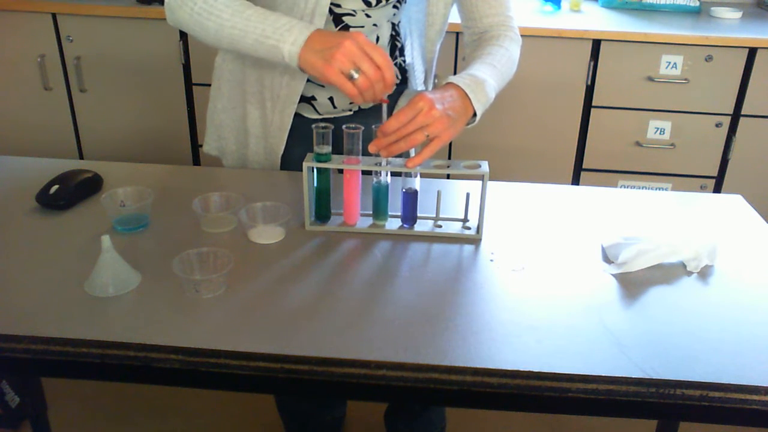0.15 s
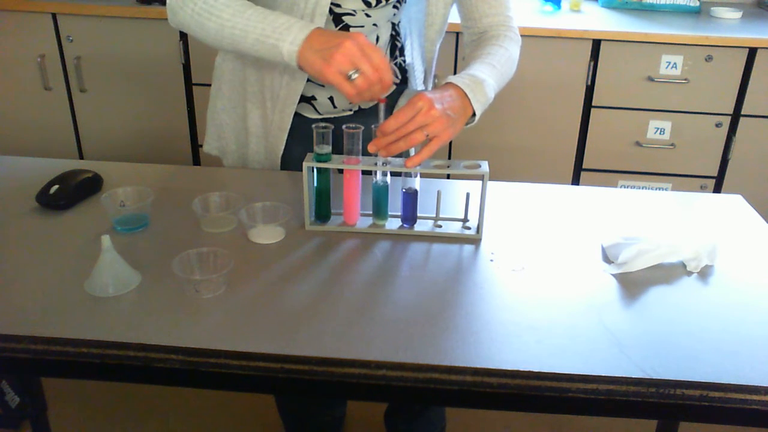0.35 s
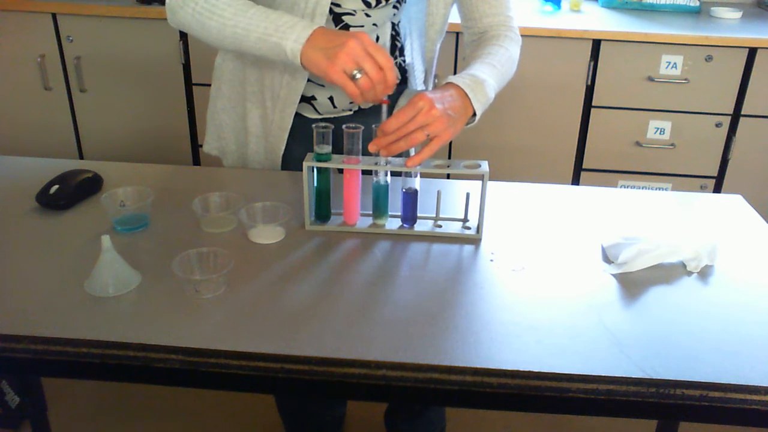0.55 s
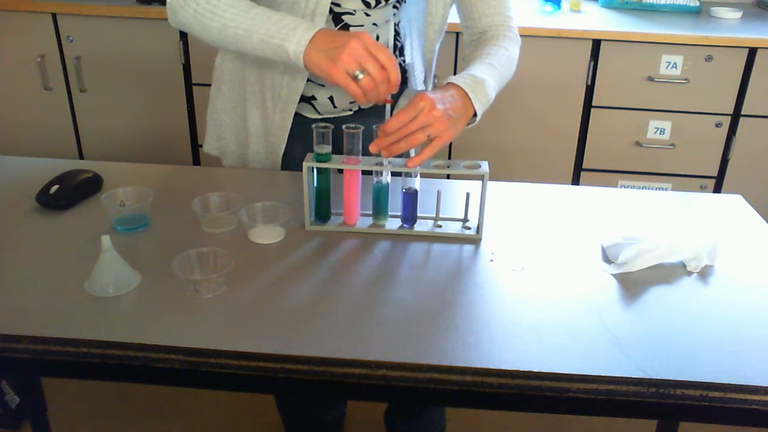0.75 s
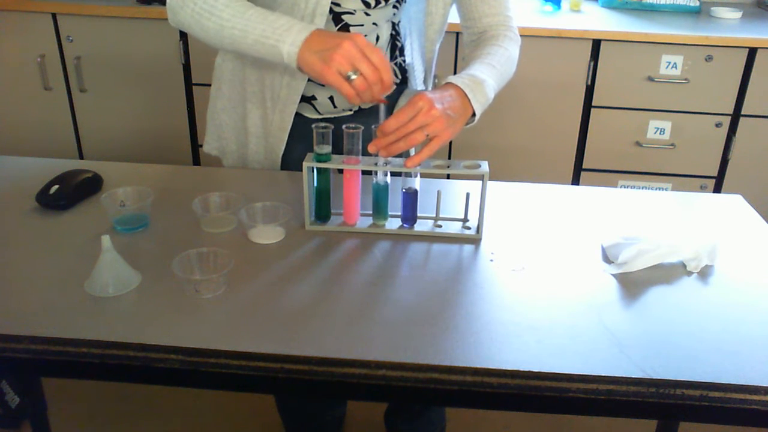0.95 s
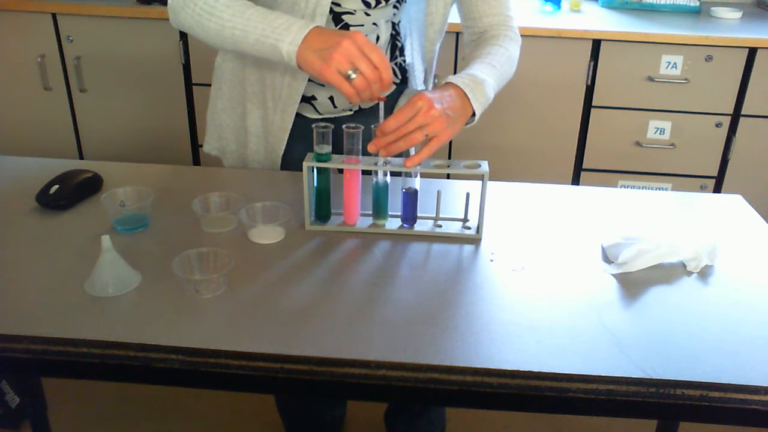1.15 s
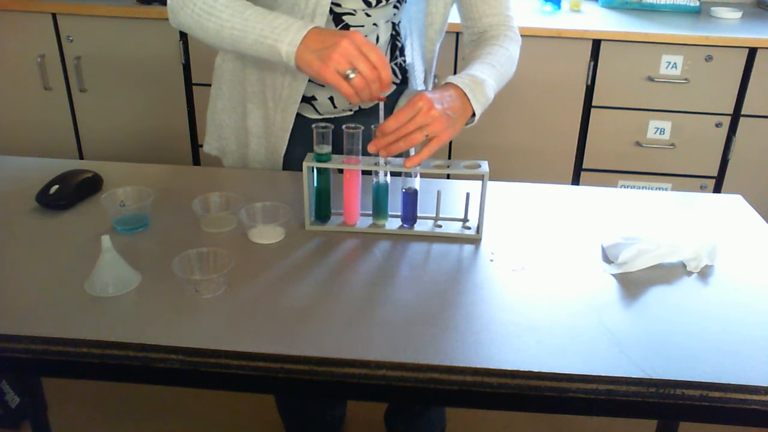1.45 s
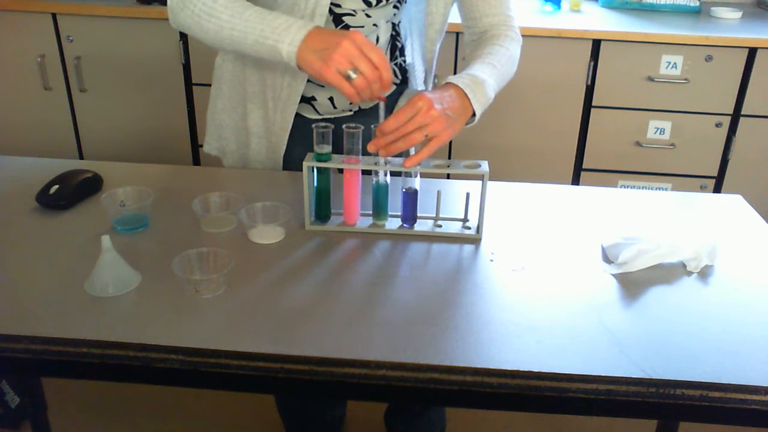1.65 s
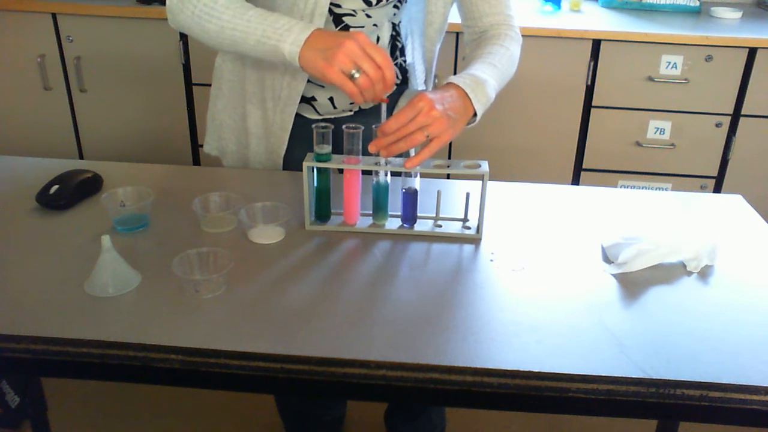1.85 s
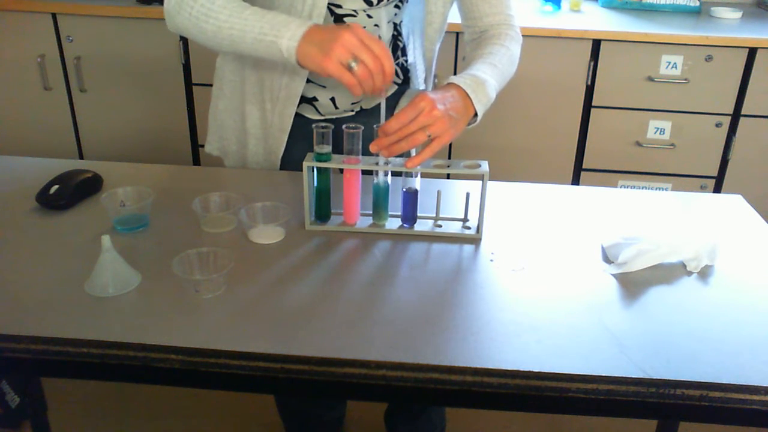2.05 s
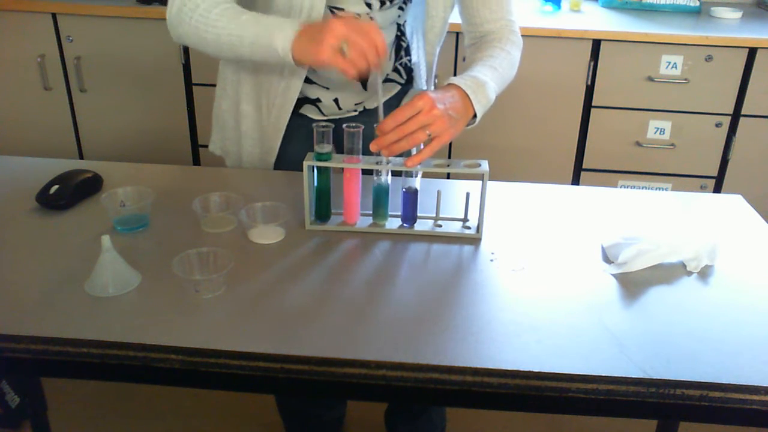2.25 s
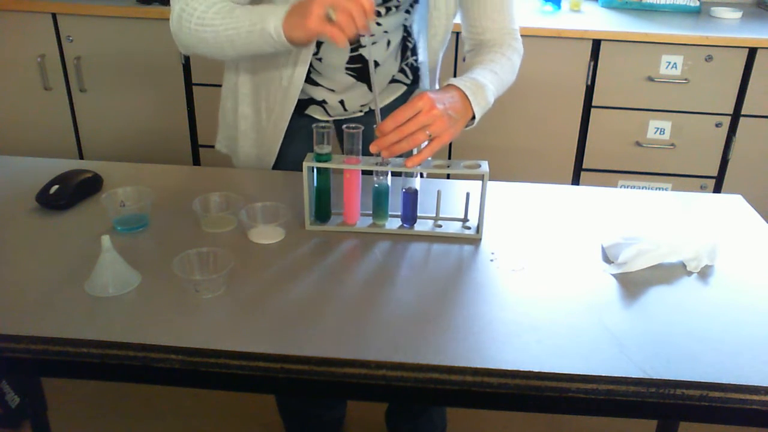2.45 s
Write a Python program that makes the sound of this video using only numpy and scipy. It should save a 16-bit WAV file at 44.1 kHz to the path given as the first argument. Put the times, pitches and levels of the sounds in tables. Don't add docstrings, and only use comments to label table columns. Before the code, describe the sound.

Sharp glassy knocks come singly and in quick pairs as a stem is stirred in a liquid-filled tube, then grow denser and louder after two seconds, over soft room hum, with short indoor reverberation.

```python
import sys
import numpy as np
from scipy import signal
from scipy.fft import rfft, irfft, next_fast_len
from scipy.io import wavfile
from scipy.ndimage import uniform_filter1d, map_coordinates

SR = 44100
rng = np.random.default_rng(int(sys.argv[2]) if len(sys.argv) > 2 else 0)


def magnitude_from_level(level_db):
    exponent = np.asarray(level_db, float) / 20
    return 10 ** exponent


def waveform_to_disk(signal):
    frames = np.transpose(np.atleast_2d(signal))
    scaled = np.clip(frames, -1, 1) * 32767
    samples = np.round(scaled).astype(np.int16)
    wavfile.write(sys.argv[1], SR, samples)


N = 114660
T = np.arange(SR // 5) / SR
LIFT_S = 2.0

# (frequency [Hz], density [dB per Hz])
AIR_SPECTRUM = [(20, -5.5), (45, 2.5), (700, -3), (1100, -16), (1900, -24), (4600, -24), (12000, -21.5),
                (15700, -20.5)]
# (frequency [Hz], level [dB])
MAINS_LINES = [(59, -75), (120, -78.5), (177, -77.5)]
# (time [s], peak level [dB], strongest pitch [Hz], contact [s])
SLIDING_TOUCHES = [(0.009, -40.5, 8340, 0.02), (0.031, -32, 6200, 0.078), (0.313, -32.5, 5700, 0.064),
                   (0.397, -39, 2600, 0.063), (0.422, -31, 4930, 0.011), (0.481, -53, 7800, 0.0048),
                   (0.497, -34.5, 4480, 0.024), (0.62, -43, 2910, 0.048), (0.664, -31, 5350, 0.044),
                   (0.811, -32.5, 5200, 0.025), (0.827, -36, 4700, 0.028), (0.875, -33.5, 5600, 0.027),
                   (0.899, -33.5, 4700, 0.052), (.936, -25.5, 7780, 0.019), (0.978, -35.5, 6400, 0.022),
                   (1.007, -30.5, 7040, 0.0039), (1.0719, -34, 5800, 0.014), (1.126, -39, 8000, 0.066),
                   (1.145, -35, 5700, 0.081), (1.19, -33, 4700, 0.07), (1.329, -22, 6900, 0.0038),
                   (1.421, -33, 5400, 0.0049), (1.438, -39.5, 5560, 0.023), (1.479, -41, 10200, 0.017),
                   (1.521, -24, 9400, 0.0032), (1.567, -32.5, 10300, 0.032), (1.582, -26.5, 5300, 0.0091),
                   (1.671, -27.5, 4700, 0.035), (1.688, -34.5, 5080, 0.099), (1.721, -18.5, 11600, 0.0028),
                 (1.844, -34, 3260, 0.0029), (1.851, -30, 7160, 0.0051), (1.8618, -26.5, 7250, 0.0023),
                 (1.885, -34.5, 8050, 0.0069), (1.934, -24.5, 4800, 0.03), (2.003, -51, 9700, 0.0043),
                 (2.122, -33, 5600, 0.13), (2.053, -34.5, 6820, 0.0053), (2.23, -34.5, 4440, 0.0091),
                 (2.2894, -15.5, 7680, 0.045), (2.326, -25.5, 9520, 0.022), (2.3863, -20.5, 9780, 0.017),
                 (2.409, -28.5, 7260, 0.013), (2.435, -47.5, 5700, 0.066), (2.499, -40.5, 5760, 0.031),
                 (2.489, -21, 3500, 0.0081)]
# (frequency [Hz], width [Hz], level [dB])
RUBBED_DEEP = [(2570, 68, -0.5), (2900, 71, 3), (3264, 136, -2.5), (3903, 360, -6), (4700, 128, 2),
               (5600, 69, 0.5), (6680, 440, -2.5), (7626, 270, -1.5), (8384, 340, 0), (9410, 1400, -2),
               (10150, 570, -16), (11460, 300, -9.5), (12700, 6400, -21.5)]
# (frequency [Hz], width [Hz], level [dB])
RUBBED_RAISED = [(3440, 54, 1), (4297, 530, 2.5), (5750, 53, 11), (6515, 470, 5), (6900, 470, -9),
                 (8000, 810, -1), (8830, 550, 1.5), (9700, 840, 2.5), (10740, 2200, -1.5),
                 (15700, 3000, -17.5)]
# (frequency [Hz], width [Hz], level [dB])
RACK_BODY = [(392, 127, 2.5), (800, 290, 2), (1166, 99, 3.5), (1396, 45, 0), (2224, 710, -8)]
# (time of peak [s], peak level [dB], strongest pitch [Hz])
LIGHT_TICKS = [(0.009, -45.5, 8000), (0.0176, -54, 7700), (0.1121, -55, 7000), (0.127, -44.5, 7300),
               (0.1634, -32.5, 9400), (0.3195, -37.5, 8040), (0.3521, -44, 5600), (0.388, -40, 6560),
               (0.3978, -37, 8940), (0.4239, -40.5, 4800), (0.433, -36.5, 6940), (0.4815, -53, 8100),
               (0.6518, -54, 8000), (0.8109, -44, 5030), (0.8287, -41, 5150), (0.8456, -45, 8000),
               (0.877, -43, 5600), (0.8897, -40, 5470), (0.901, -35, 5600), (0.9317, -41, 7260),
               (0.9394, -40, 7170), (0.9808, -41, 7300), (1.0113, -44.5, 7200), (1.075, -38, 9200),
               (1.1298, -48, 9800), (1.175, -40, 5670), (1.214, -40, 4700), (1.217, -41, 4700),
               (1.234, -49, 4700), (1.2566, -45, 2600), (1.343, -29, 9100), (1.3542, -26.5, 8750),
               (1.4234, -51, 4800), (1.4283, -41, 5480), (1.4414, -43, 4700), (1.4795, -41, 9160),
               (1.5244, -24.5, 9200), (1.5699, -40, 9900), (1.5858, -32, 4700), (1.6747, -30.5, 5600),
               (1.6943, -35, 4800), (1.7228, -23, 10830), (1.7472, -22.5, 8000), (1.7572, -30.5, 8530),
               (1.8517, -27, 7400), (1.8634, -24.5, 7070), (1.888, -38, 7430), (1.937, -29, 4800),
               (1.964, -34, 7100), (2.0044, -42, 9750), (2.0825, -20, 5830), (2.1562, -39.5, 4700),
               (2.233, -35.5, 4470), (2.291, -26, 8400), (2.2968, -20, 8100), (2.3274, -17.5, 8940),
               (2.389, -19.5, 10550), (2.409, -31.5, 7000), (2.4195, -29, 10030), (2.4922, -27, 3500)]
# (time [s], frequency [Hz], level [dB], length [s])
RACK_SHAKES = [(0.012, 889, -47, 0.048), (0.016, 323, -55.5, 0.079), (0.144, 1194, -58, 0.016),
               (.15, 800, -52.5, 0.012), (0.214, 725, -43.5, 0.029), (0.26, 628, -56.5, 0.037),
               (0.33, 109, -60.5, 0.027), (0.44, 231, -65, 0.094), (0.498, 845, -58, 0.049),
               (0.625, 967, -58.5, 0.11), (0.678, 353, -52, 0.068), (0.698, 1170, -54.5, 0.03),
               (0.68, 773, -52, 0.03), (0.81, 771, -58, 0.097), (0.943, 1180, -57, 0.0078),
               (1.067, 128, -52.5, 0.031), (1.073, 800, -61.5, 0.068), (1.118, 349, -62, 0.054),
               (1.342, 338, -57.5, 0.058), (1.336, 758, -55, 0.11), (1.432, 345, -55.5, 0.023),
               (1.5, 950, -58, 0.05), (1.581, 1344, -52.5, 0.017), (1.63, 328, -60.5, 0.073),
               (1.65, 1640, -66, 0.025), (1.655, 1050, -64.5, 0.013), (1.749, 363, -44.5, 0.016),
               (1.857, 910, -58.5, 0.052), (1.928, 906, -53, 0.036), (2.083, 474, -51.5, 0.034),
               (2.148, 930, -64, 0.065), (2.314, 343, -40.5, 0.035), (2.311, 760, -41, 0.048)]
# (time [s], peak level [dB], rattle re knock [dB], extra level of the lowest glass mode [dB])
HARD_KNOCKS = [(0.1464, -6.5, -21.5, -3.5), (0.2194, -8.5, -25, -10), (0.2236, 0, -23, -2.5),
               (0.3806, -6.5, -19.5, -7.5), (0.7054, -1, -24.5, -3), (1.2402, -14.5, -27.5, -2),
               (1.336, -0.5, -22.5, -7.5), (1.5072, 1.5, -26, -3.5), (1.7403, 0.5, -23.5, -3.5),
               (2.0409, 4.5, -26.5, -4.5), (2.072, -0.5, -33, -6.5), (2.0761, -1.5, -23, -2.6),
               (2.311, 6.5, -26, -2.4), (2.0428, -0.5, -30.5, 0)]
# (frequency [Hz], width [Hz], level [dB])
STRUCK_DEEP = [(3350, 520, -5), (4650, 350, -19), (5450, 300, -15), (7000, 520, 1), (8300, 600, -8),
               (9100, 430, 0), (10800, 400, -12), (11900, 500, -16), (14200, 700, -24)]
# (frequency [Hz], width [Hz], level [dB])
STRUCK_RAISED = [(3550, 367, 0), (4800, 115, -24.5), (6580, 970, 4), (7130, 375, -1), (8080, 630, 0.5),
                 (9190, 560, 0.5), (12930, 290, -13.5), (12670, 230, -39), (13300, 1000, -31.5)]
# (frequency [Hz], width [Hz], level [dB])
UPPER_PLATE = [(1280, 220, -3), (2040, 110, -4.1), (2600, 550, 1)]
# (frequency [Hz], decay by 60 dB [s])
ROOM_DECAY = [(300, 0.51), (3000, 0.34), (12000, 0.18)]

AIR_DB, AIR_TOP_HZ = -61, 15900
GRIT_DB, GRIT_RATE, PATCHY_DB = 2, 120, 5
GRAINS_PER_S, GRAIN_DB, GRAIN_SPREAD_DB = 450, 11, 1.5
COLOUR_DB, FOCUS_HZ, LOW_CUT_HZ = 3, 250, 2100
TOUCH_DB, FOCUS_DB, LEAN_DB, BODY_DB = -13.5, 10.5, 0.5, -20
SLIDE_RISE_S, SLIDE_RISE_SHARE = 0.00065, 0.044
SLIDE_FADE_DB_PER_S, LET_GO_T60_S = 161, 0.068
MODE_SCATTER_DB, PITCH_SCATTER = 3.5, 0.012
TICK_RISE_S, TICK_WIDTH_HZ, TICK_SIDE_DB, TICK_LEAN_DB = 0.0012, 290, -8.5, 12.5
SHAKE_RISE_S, SHAKE_FALL_S, PANEL_WIDTH_HZ, BROAD_SHARE = 0.0046, 0.12, 92, 0.61
RING_RISE_S, RATTLE_T60_S = 0.0011, 0.053
KNOCK_CUT_HZ = 2870
THUD_DB, THUD_FOLLOWS, THUD_T60_S = -40.5, 0.86, 0.096
CLACK_DB, CLACK_T60_S = -41.5, 0.11
ROOM_DB = -22
PEAK_TOP = 1.15


def unit(x):
    return x / np.sqrt(np.mean(x ** 2) + 1e-20)


def along(points, hz):
    f, v = np.transpose(points)
    return np.interp(np.log(hz + 1), np.log(f + 1), v)


def filtered(x, response):
    m = next_fast_len(len(x) + 4096)
    return irfft(rfft(x, m) * response(np.fft.rfftfreq(m, 1 / SR)), m)[:len(x)]


def resonances(peaks):
    def response(f):
        total = 0
        for k, (centre, width, db) in enumerate(peaks):
            damping = 1j * f * width
            total = total + (-1) ** k * magnitude_from_level(db) * damping / (centre * centre - f * f + damping)
        return total
    return response


def wobble(rate, size):
    return map_coordinates(rng.standard_normal(size), [np.arange(size) * rate / SR])


def add(out, s, x):
    part = out[round(s * SR):][:len(x)]
    part += x[:len(part)]


def background():
    t = np.arange(N) / SR
    noise = filtered(rng.standard_normal(N), lambda f: magnitude_from_level(along(AIR_SPECTRUM, f)) * (f < AIR_TOP_HZ))
    out = unit(noise) * magnitude_from_level(AIR_DB + 1.3 * wobble(5.5, N))
    for hz, db in MAINS_LINES:
        out += magnitude_from_level(db + 8.0 + 0.55 * wobble(11.0, N)) * np.sin(2 * np.pi * hz * t)
    return out


def grit():
    z = signal.stft(rng.standard_normal(len(T)), nperseg=128)[2]
    field = uniform_filter1d(rng.standard_normal(z.shape), size=4, axis=0)
    field = uniform_filter1d(field, size=6, axis=1)
    hiss = signal.istft(z * magnitude_from_level(PATCHY_DB * unit(field)), nperseg=128)[1][:len(T)]
    struck = rng.random(len(T)) < GRAINS_PER_S / SR
    grains = struck * magnitude_from_level(GRAIN_DB + GRAIN_SPREAD_DB * rng.exponential(size=len(T)))
    return unit((unit(hiss) + grains) * magnitude_from_level(GRIT_DB * wobble(GRIT_RATE, len(T))))


def rubbing(s, envelope, focus_hz, focus_db, lean_db):
    glass = RUBBED_RAISED if s > LIFT_S else RUBBED_DEEP
    scatter = rng.standard_normal(len(RUBBED_DEEP))
    wall = [(c, w, db + COLOUR_DB * r) for (c, w, db), r in zip(glass, scatter)]
    f = np.fft.rfftfreq(2 * len(T), 1 / SR)
    focus = focus_db / (1 + ((f - focus_hz) / FOCUS_HZ) ** 2)
    lean = lean_db * abs(np.log2((f + 1) / focus_hz))
    low_cut = 1 + (LOW_CUT_HZ / (f + 1)) ** 6
    shape = resonances(wall)(f) * magnitude_from_level(focus - lean) / low_cut * (f < AIR_TOP_HZ)
    shape = shape / np.sqrt(np.mean(abs(shape) ** 2))
    return irfft(rfft(grit() * envelope, 2 * len(T)) * shape)[:len(T)]


def body(envelope):
    murmur = unit(filtered(rng.standard_normal(len(T)), resonances(RACK_BODY)))
    return murmur * envelope * (1 - np.exp(-T / 0.0088))


def touches():
    out = np.zeros(N)
    for s, db, hz, hold in SLIDING_TOUCHES:
        slide = magnitude_from_level(-SLIDE_FADE_DB_PER_S * T - 60 * np.maximum(T - hold, 0) / LET_GO_T60_S)
        settling = 1 - np.exp(-T / (SLIDE_RISE_S + SLIDE_RISE_SHARE * hold))
        glass = rubbing(s, slide * settling, hz, FOCUS_DB, LEAN_DB)
        murmur = magnitude_from_level(BODY_DB - 0.13 * (db + 48.5)) * body(slide)
        add(out, s, magnitude_from_level(db + TOUCH_DB) * (glass + murmur))
    return out


def ticks():
    out = np.zeros(N)
    scatter = rng.standard_normal((len(LIGHT_TICKS), 2, len(RUBBED_DEEP)))
    for (s, db, hz), r in zip(LIGHT_TICKS, scatter):
        modes = [(hz, TICK_WIDTH_HZ, 0)]
        for c, w, level in (RUBBED_RAISED if s > LIFT_S else RUBBED_DEEP)[:-1]:
            side_db = level + TICK_SIDE_DB - TICK_LEAN_DB * abs(np.log2(c / hz))
            modes.append((c, max(w, TICK_WIDTH_HZ), side_db))
        ring = np.zeros(len(T))
        for (c, w, level), a, phase in zip(modes, *r):
            gain = magnitude_from_level(level + MODE_SCATTER_DB * a * (c != hz))
            ring += gain * np.exp(-np.pi * w * T) * np.sin(2 * np.pi * c * T + phase)
        ring *= (1 - np.exp(-T / TICK_RISE_S)) ** 2
        peak = abs(ring).argmax()
        add(out, s - peak / SR, magnitude_from_level(db) * ring / abs(ring).max())
    return out


def rack():
    out = np.zeros(N)
    for s, hz, db, length in RACK_SHAKES:
        shape = (1 - np.exp(-T / SHAKE_RISE_S)) * magnitude_from_level(-60 * np.maximum(T - length, 0) / SHAKE_FALL_S)
        mode = resonances([(hz, PANEL_WIDTH_HZ * (hz / 800) ** 0.4, 0)])
        panel = unit(filtered(rng.standard_normal(len(T)), lambda f: mode(f) ** 2))
        add(out, s, magnitude_from_level(db) * shape * (panel + BROAD_SHARE * body(0.46)))
    return out


def knocks():
    out = np.zeros(N)
    for s, db, rattle_db, low_db in HARD_KNOCKS:
        modes = STRUCK_RAISED if s > LIFT_S else STRUCK_DEEP
        ring = np.zeros(len(T))
        for (hz, w, level), a, b in zip(modes, *rng.standard_normal((2, len(modes)))):
            gain = magnitude_from_level(level + MODE_SCATTER_DB * a + low_db * (hz == modes[0][0]))
            pitch = hz * (1 + PITCH_SCATTER * b)
            ring += gain * np.exp(-np.pi * w * T) * np.sin(2 * np.pi * pitch * T)
        ring *= 1 - np.exp(-T / RING_RISE_S)
        ring = filtered(ring, lambda f: (f * f / (KNOCK_CUT_HZ ** 2 - f * f + 1j * f * KNOCK_CUT_HZ)) ** 2)
        thud = magnitude_from_level(THUD_DB + THUD_FOLLOWS * db) * body(magnitude_from_level(-60 * T / THUD_T60_S))
        rattle = rubbing(s, magnitude_from_level(rattle_db - 60 * T / RATTLE_T60_S), 8000, 0, 1.57)
        add(out, s, magnitude_from_level(db) * (ring + rattle) + thud)
    return out


def clacks():
    out = np.zeros(N)
    for s, db, *_ in HARD_KNOCKS:
        envelope = magnitude_from_level(db + CLACK_DB - 60 * T / CLACK_T60_S) * (1 - np.exp(-T / 0.0074))
        add(out, s, envelope * unit(filtered(grit(), resonances(UPPER_PLATE))))
    return out


def room(x):
    hz, t, z = signal.stft(rng.standard_normal(SR // 2), SR, nperseg=256)
    decay = magnitude_from_level(-60 * t / along(ROOM_DECAY, hz)[:, None])
    tail = signal.istft(z * decay, SR, nperseg=256)[1]
    delayed = np.pad(x, (300, 0))
    return signal.fftconvolve(delayed, tail / np.linalg.norm(tail))[:N]


def scene():
    near = knocks() + touches() + rack() + ticks() + clacks()
    return (near + magnitude_from_level(ROOM_DB) * room(near) + background())[None]


def band_limit(x):
    return signal.sosfilt(signal.butter(12, 16800, fs=SR, output="sos"), x)


def record(dry):
    soft = dry / (1 + np.abs(dry / PEAK_TOP) ** 3) ** (1 / 3)
    finished = filtered(soft[0], lambda f: f < 16800)[None]
    return band_limit(finished)


dry = scene()
out = record(dry)
waveform_to_disk(out)
```